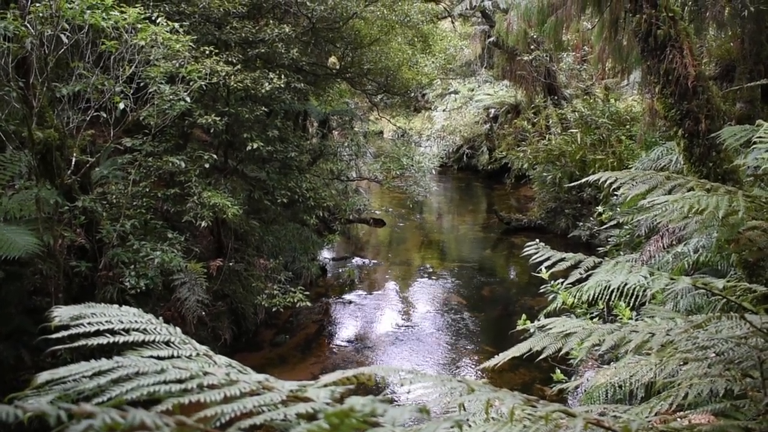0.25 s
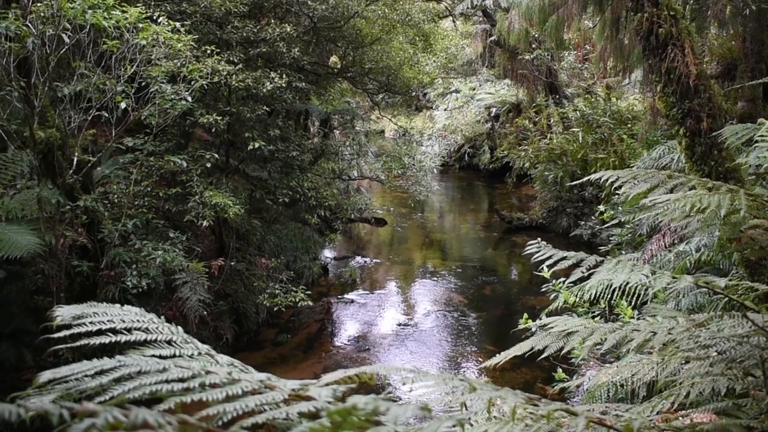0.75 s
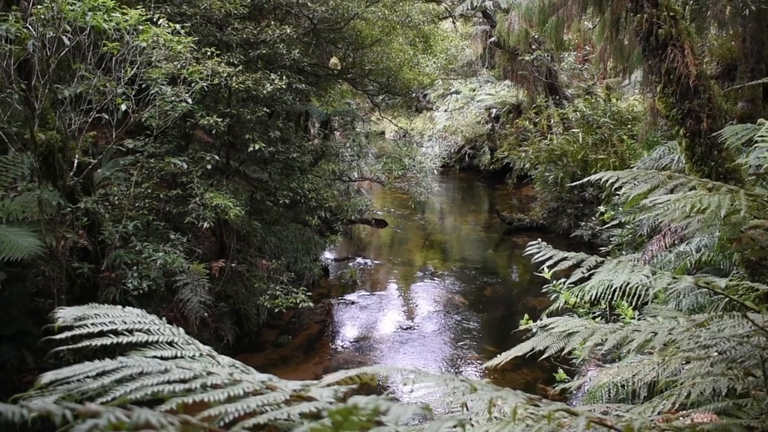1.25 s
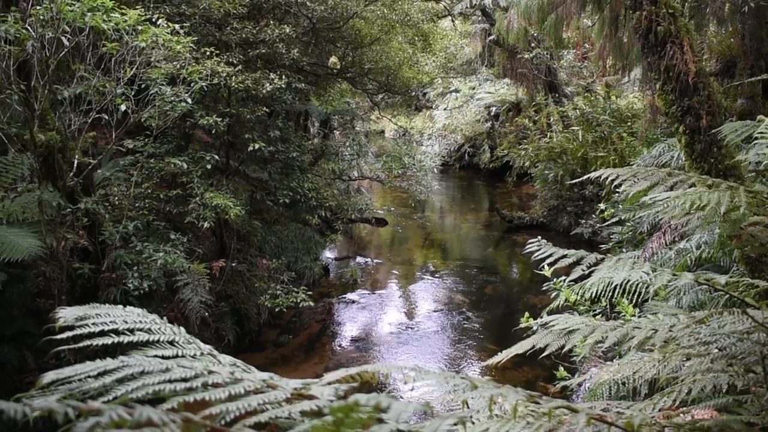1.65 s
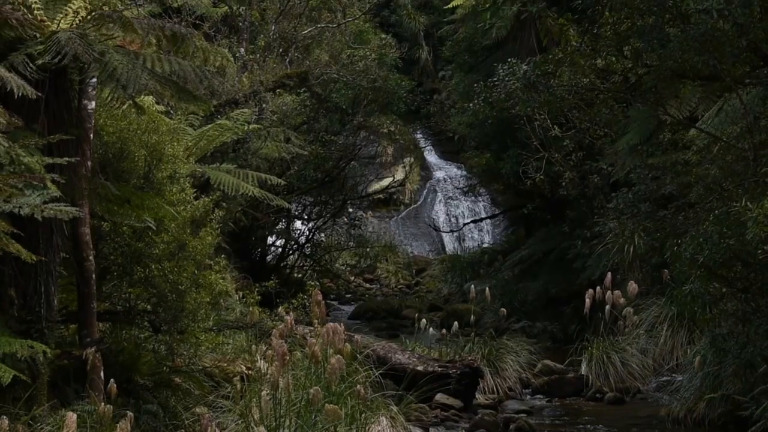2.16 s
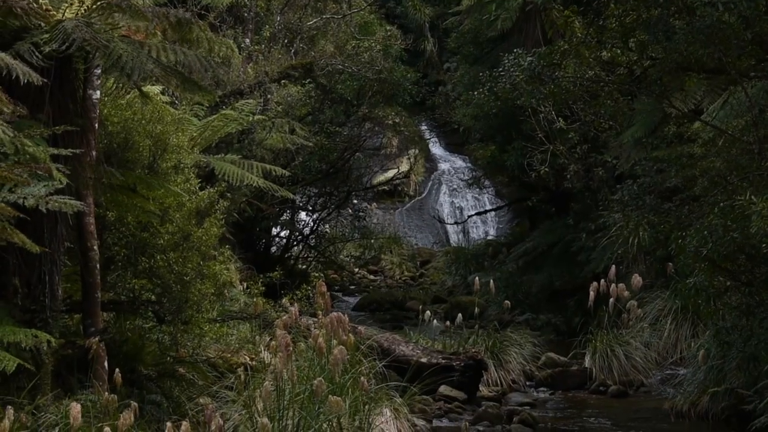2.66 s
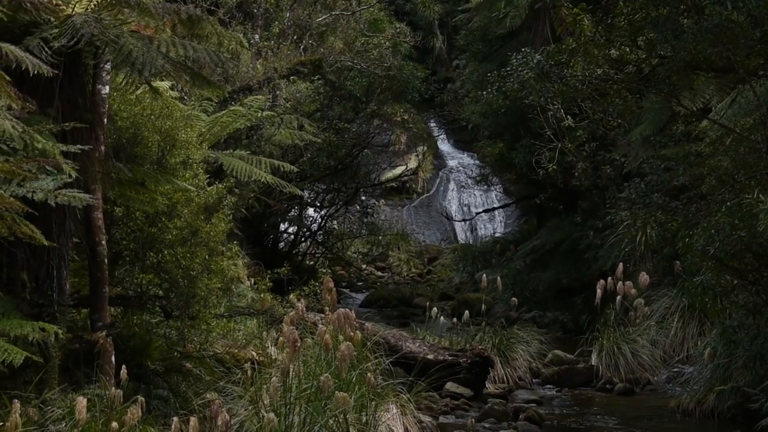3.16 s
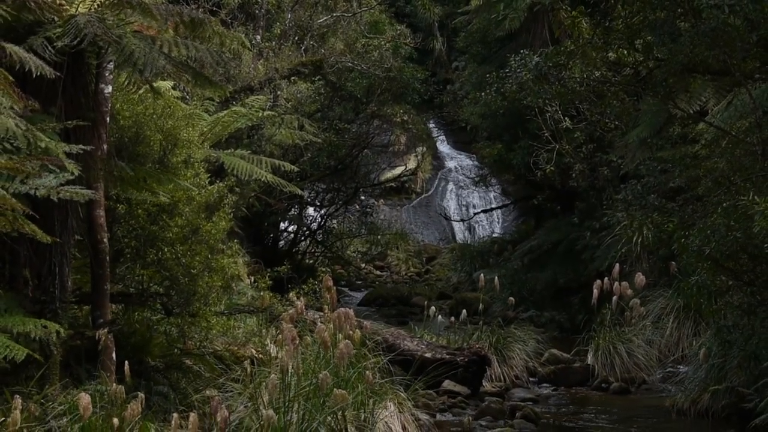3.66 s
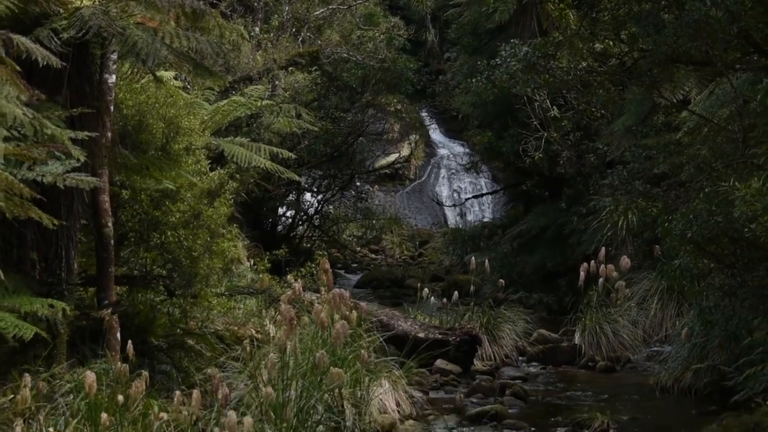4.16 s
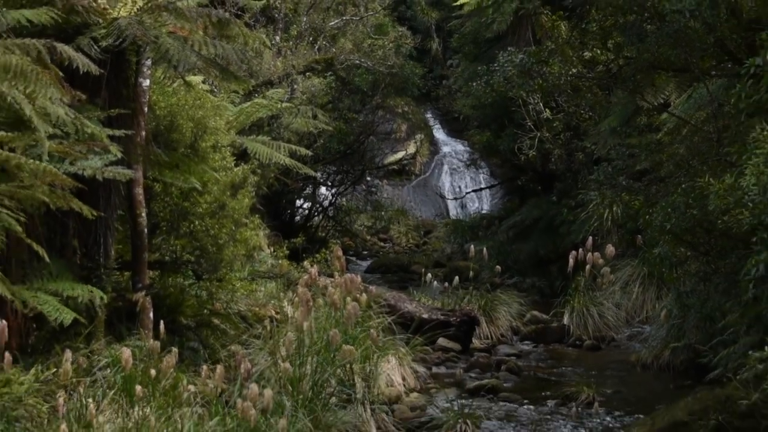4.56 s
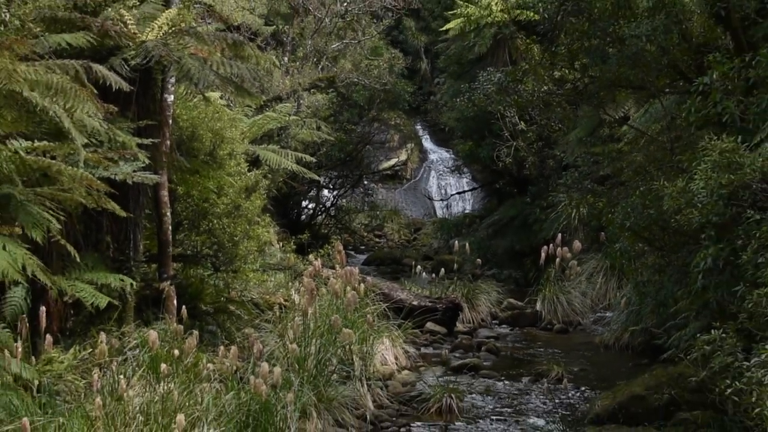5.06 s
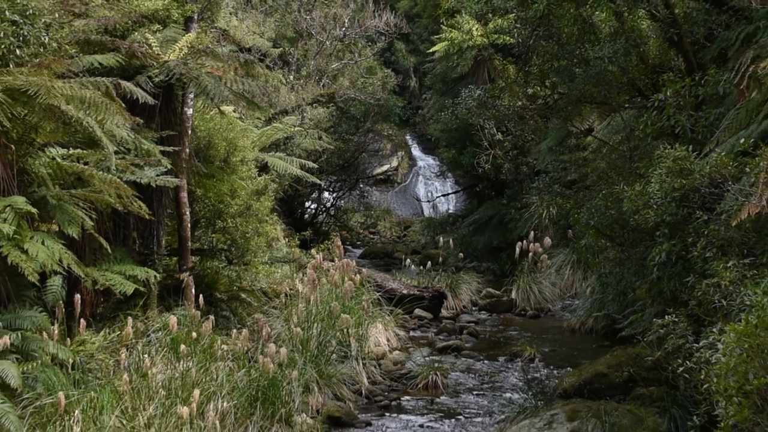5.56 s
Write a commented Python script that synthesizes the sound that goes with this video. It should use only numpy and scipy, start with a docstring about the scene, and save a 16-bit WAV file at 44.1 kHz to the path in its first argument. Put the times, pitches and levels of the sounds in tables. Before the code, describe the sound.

A soft, distant creek murmurs among ferns, with a tiny woody click near the start, faint bubbles and one small drip. A bird gives three high falling whistles that echo among the trees. Just before two seconds a soft low bump marks a hard cut to much louder rapids below a waterfall: steady rush, dense bubbling, gurgles and crisp spray, staying loud to the end. Both channels are identical.

```python
"""A slow creek murmurs in fern forest as band-modulated noise; a small woody click, a sum of damped modes, sounds.
Single bubbles (rising damped sines) and drops (noise bursts) stand out, and a bird gives three falling whistles.
Then the scene switches at once, with a soft low bump, to rocky rapids below a waterfall: a broad noise rush,
crowds of ringing bubbles, gurgling resonant hollows between the stones and spits of spray.
Both channels carry the same sound."""
import sys
import numpy as np
from scipy import signal
from scipy.fft import rfft, irfft, next_fast_len
from scipy.io import wavfile

SR = 44100
rng = np.random.default_rng(int(sys.argv[2]) if len(sys.argv) > 2 else 0)


def store_wav(level_fs):
    """Save 16-bit WAV to argv[1]."""
    pcm = np.round(np.clip(np.atleast_2d(level_fs), -1, 1) * 32767)
    wavfile.write(sys.argv[1], SR, pcm.T.astype(np.int16))


N = 256220
TIME = np.arange(N) / SR  # s

# far wash of the creek: (frequency [Hz], relative level per Hz [dB])
CREEK_SPECTRUM = [(25, -4.5), (60, -28), (100, -15.5), (140, -14.5), (210, -9.5), (270, -6), (380, -5),
                  (800, -2), (1850, -4), (4750, -8.5), (7500, -11), (10000, -14.5), (12500, -20),
                  (15500, -23.5)]
# a small hard thing clicks and bounces: (time [s], level [dB], low-pass edge [Hz])
CLICK_CONTACTS = [(0.2489, -35.5, 7000), (0.2517, -35.5, 3400), (0.2527, -45, 3400)]
# vibration modes of the clicking body: (frequency [Hz], level [dB], decay by 60 dB [s])
CLICK_MODES = [(405, -16, 0.016), (680, -12, 0.018), (1480, -3.5, 0.0086), (1850, -6, 0.012),
               (2590, -6, 0.013), (3000, -4.5, 0.015), (3220, -22, .011), (6200, -7, .003),
               (9200, -2, .003)]
# the loudest single bubbles: (time [s], starting pitch [Hz], level before the envelope [dB])
LOUD_BUBBLES = [(0.527, 980, -51), (0.647, 2300, -52), (0.660, 740, -49), (0.760, 1860, -49),
                (1.433, 1030, -52), (2.362, 610, -30), (2.686, 1070, -25.5), (2.823, 1070, -30),
                (2.958, 1826, -31), (3.148, 1386, -26), (3.424, 1100, -29), (3.753, 2730, -26),
                (4.155, 620, -34), (4.432, 1540, -28), (4.729, 2130, -26.5), (5.124, 1680, -30),
                (5.325, 1680, -28), (5.485, 813, -30)]
# the loudest drops smacking on rock: (time [s], peak level [dB], band centre [Hz])
LOUD_DROPS = [(0.7962, -47, 5600), (2.1362, -27, 7950), (2.548, -27, 7000), (2.9057, -30, 7950),
              (3.146, -25, 6900), (3.19, -28, 7000), (3.5862, -25.5, 7400), (3.7333, -26, 7700),
              (4.5745, -27, 6400), (4.8058, -25, 8800), (5.08, -29, 8700)]
# the bird's whistles: (time [s], length [s], pitch before sag [Hz], sag [Hz/s], crest [share of pitch],
# slide time [s], starting level [dB], rasp [share of pitch])
WHISTLES = [(1.117, 0.21, 4910, 1198, .075, 0.037, -54, .055),
            (1.474, .19, 4490, -250, 0.084, .052, -54.5, .05),
            (1.776, .19, 4270, -900, .13, .033, -49.5, .022)]
# far wash of the waterfall: (frequency [Hz], relative level per Hz [dB])
FALL_SPECTRUM = [(25, -46), (60, -37.5), (105, -42), (190, -23.5), (270, -14), (450, -7), (600, 0),
                 (820, -3), (1900, -1.5), (3600, -8), (8000, -12.5), (10000, -16.5), (12600, -28.5),
                 (15500, -36)]
# strength of the bubbles by pitch: (frequency [Hz], relative level per Hz [dB])
BUBBLE_COLOUR = [(250, -11), (450, -3), (700, -2.5), (1400, 4), (2300, 0), (3500, -5), (6000, -13.5)]
# strength of the spray by pitch: (frequency [Hz], relative level per Hz [dB])
SPRAY_COLOUR = [(2000, -8), (4000, -5), (7500, 0), (10000, -3), (12000, -14)]
# hollows between the stones, rung by plunging water: (frequency [Hz], bandwidth [Hz], level before drift [dB])
HOLLOWS = [(166.5, 7.1, -72), (269, 56, -68), (597, 91, -48), (964, 126, -46.5)]

SWITCH_S = 1.908
CUTOFF_HZ = 15800
# reference levels, to which each layer adds its own share
CREEK_DB, RUSH_DB, SPRAY_DB = -58, -36, -45
SPRAY_SURGE_DB, SPRAY_SURGES_PER_S = 1.4, 3.4
PLOP_T60_S = 0.053
# a whistle starts below its pitch by this share, and flicks up in this time
FLICK, FLICK_S = 0.24, 0.00707
WHISTLE_ATTACK_S, WHISTLE_RELEASE_S, WHISTLE_FADE_DB_PER_S = 0.01, 0.022, 28
DRIFT_STEP = 40  # samples between the points of a slow random curve


def from_db(db):
    """Logarithmic level: decibels become an amplitude gain."""
    return 10 ** (np.asarray(db) / 20)


def rms_one(x):
    """Power normalisation: the root mean square becomes one."""
    return x / np.sqrt(np.mean(x ** 2) + 1e-20)


def gain_at(spectrum, hz):
    """Spectral envelope: levels are interpolated on a log-frequency axis."""
    points, db = np.transpose(spectrum)
    return from_db(np.interp(np.log(np.maximum(hz, 1)), np.log(points), db))


def drift(rate):
    """Low-passed chance: noise through a double pole wanders about `rate` times a second, with spread 1."""
    pole = np.exp(-2 * np.pi * rate * DRIFT_STEP / SR)
    warm_up = 2000
    noise = rng.standard_normal(N // DRIFT_STEP + 2 + warm_up)
    slow = signal.lfilter([1], [1, -2 * pole, pole * pole], noise)[warm_up:]
    return np.interp(np.arange(N) / DRIFT_STEP, np.arange(len(slow)), rms_one(slow))


def ring(clicks, hz, t60):
    """Damped resonance: a unit click excites a decaying cosine of height 1."""
    radius = np.exp(-np.log(1000) / (t60 * SR))
    angle = 2 * np.pi * hz / SR
    poles = [1, -2 * radius * np.cos(angle), radius * radius]
    return signal.lfilter([1, 0, -1], poles, clicks + 1e-18) / 2


def add(out, s, sound):
    """Superposition: a short sound is summed in at time s."""
    at = round(s * SR)
    out[at:at + len(sound)] += sound[:N - at]


def soften(x, edge_hz, order=2):
    """Low-pass filtering: the treble above the edge is attenuated."""
    return signal.sosfilt(signal.butter(order, edge_hz, fs=SR, output="sos"), x)


def wash(spectrum, patchy_db, flicker_rate, count=20):
    """Incoherent sum: countless far splashes merge into noise whose bands swell and sink independently."""
    size = next_fast_len(N)
    hz = np.arange(size // 2 + 1) * SR / size
    noise = rfft(rng.standard_normal(size)) * gain_at(spectrum, hz)
    band = np.digitize(hz, np.geomspace(100, 14000, count - 1))
    out = np.zeros(N)
    for k in range(count):
        out += irfft(noise * (band == k), size)[:N] * from_db(patchy_db * drift(flicker_rate))
    return rms_one(out)


def grains(colour, per_s, cycles, spread_db, clump_db, clump_rate, count=28):
    """Clustered random excitation: grains of random strength each ring down 60 dB in some cycles."""
    strength_db = spread_db * np.minimum(rng.exponential(1, N), 4)
    strengths = from_db(strength_db) * rng.choice([-1, 1], N)
    born = rng.random(N) < per_s * from_db(clump_db * drift(clump_rate)) / SR
    clicks = strengths * born
    dealt = rng.integers(0, count, N)
    out = np.zeros(N)
    for k, hz in enumerate(np.geomspace(colour[0][0], colour[-1][0], count)):
        # the factor hz offsets shorter rings and wider pitch steps
        out += gain_at(colour, hz) * hz * ring(clicks * (dealt == k), hz, cycles / hz)
    return rms_one(out)


def forest(x, t60, wet_db):
    """Diffuse scattering: trunks and leaves spread a sound into a decaying noise tail."""
    t = TIME[:SR]
    tail = rng.standard_normal(SR) * np.exp(-np.log(1000) * t / t60) * (1 - np.exp(-t / 0.01))
    tail /= np.sqrt(np.sum(tail ** 2))
    return x + from_db(wet_db) * signal.fftconvolve(x, tail)[:N]


def creek():
    """Noise and bubble resonance: a soft wash carries a little babbling, dulled by the ferns."""
    babble = grains(BUBBLE_COLOUR, per_s=330, cycles=26, spread_db=1.0, clump_db=3, clump_rate=9.1)
    babble = soften(babble, edge_hz=3900)
    murmur = wash(CREEK_SPECTRUM, patchy_db=1.04, flicker_rate=4.6)
    return from_db(CREEK_DB) * (from_db(-0.23) * murmur + from_db(-15) * babble)


def click():
    """Modal vibration: a few quick contacts ring the same body, the later ones duller."""
    out, pulse = np.zeros(N), signal.unit_impulse(SR // 10)
    body = sum(from_db(db) * ring(pulse, hz, t60) for hz, db, t60 in CLICK_MODES)
    for s, db, bright_hz in CLICK_CONTACTS:
        add(out, s, from_db(db) * soften(body, bright_hz))
    return out


def plops(rise=0.026, attack_s=0.002):
    """Bubble resonance: a large bubble rings and climbs in pitch as it nears the surface."""
    out, t = np.zeros(N), TIME[:SR // 5]
    envelope = (1 - np.exp(-t / attack_s)) * np.exp(-np.log(1000) * t / PLOP_T60_S)
    for s, hz, db in LOUD_BUBBLES:
        cycles = hz * t * (1 + rise * t / PLOP_T60_S)
        add(out, s, from_db(db) * envelope * np.sin(2 * np.pi * cycles))
    return out


def spits(decay_s=0.0015, width=0.15):
    """Impact noise: a drop bursts on rock in a brief, band-passed crackle."""
    out, t = np.zeros(N), TIME[:SR // 50]
    for s, db, hz in LOUD_DROPS:
        edges = [hz / (1 + width), hz * (1 + width)]
        band = signal.butter(2, edges, "band", fs=SR, output="sos")
        burst = signal.sosfilt(band, rng.standard_normal(len(t)) * np.exp(-t / decay_s))
        add(out, s, from_db(db) * burst / np.abs(burst).max())
    return out


def bird(rasp_s=0.038, waver=0.0049, wavers_per_s=40):
    """Frequency modulation: each whistle flicks up with a rasp, slides down and rings on among the trees."""
    out, quaver, unsteady = np.zeros(N), drift(249), waver * drift(wavers_per_s)
    for s, length, hz, sag_hz_per_s, crest, slide_s, db, rasp in WHISTLES:
        age = np.clip(TIME - s, 0, length)
        fade_in, fade_out = age / WHISTLE_ATTACK_S, (length - age) / WHISTLE_RELEASE_S
        gate = np.clip(np.minimum(fade_in, fade_out), 0, 1)
        slide = crest * np.exp(-(age / slide_s) ** 4)
        flick = FLICK * np.exp(-(age / FLICK_S) ** 2)
        roughness = rasp * quaver * np.exp(-age / rasp_s)
        pitch = hz * (1 + slide - flick + unsteady + roughness) - sag_hz_per_s * age
        level = from_db(db - WHISTLE_FADE_DB_PER_S * age)
        out += gate * level * np.sin(2 * np.pi * np.cumsum(pitch) / SR)
    return forest(out, t60=0.8, wet_db=-1)


def thump(db=-47, rise_s=0.00066):
    """Single pressure pulse: a soft low bump is heard as the loud water sets in."""
    age = np.maximum(TIME - SWITCH_S, 0) / rise_s
    return -from_db(db) * age * np.exp(1 - age)


def gurgle():
    """Cavity resonance: turbulence rings the hollows, whose levels wander."""
    out = np.zeros(N)
    for hz, width, db in HOLLOWS:
        t60 = np.log(1000) / (np.pi * width)
        tone = rms_one(ring(rng.standard_normal(N), hz, t60))
        out += from_db(db + 2.16 * drift(11)) * tone
    return out


def rapids():
    """Superposed water noise: a steady rush, crowded bubbles, gurgles, and spray that surges at random."""
    rush = from_db(-0.67) * wash(FALL_SPECTRUM, patchy_db=0.64, flicker_rate=15.5)
    bubbles = grains(BUBBLE_COLOUR, per_s=1900, cycles=30, spread_db=3.5, clump_db=3.5, clump_rate=15)
    bubbles *= from_db(-6.5)
    spray = grains(SPRAY_COLOUR, per_s=2600, cycles=7.7, spread_db=6.5, clump_db=6.5, clump_rate=22)
    spray *= from_db(-4 + SPRAY_DB + SPRAY_SURGE_DB * drift(SPRAY_SURGES_PER_S))
    # small air pockets radiate no deep bass
    high_pass = signal.butter(4, 135, "high", fs=SR, output="sos")
    near = signal.sosfilt(high_pass, from_db(RUSH_DB) * bubbles + gurgle())
    return from_db(RUSH_DB) * rush + soften(near + spray, edge_hz=10500, order=4)


def scene():
    """Superposition: the creek, then the rapids; single bubbles and drops stand out of both."""
    forest_creek = creek() + click() + bird()
    water = np.where(TIME < SWITCH_S, forest_creek, rapids())
    mono = water + plops() + spits() + thump()
    return np.stack([mono, mono])


def record(dry):
    """Band limiting: a steep elliptic low-pass cuts the top."""
    low_pass = signal.ellip(12, 0.1, 80, CUTOFF_HZ, fs=SR, output="sos")
    return signal.sosfilt(low_pass, dry)


dry = scene()
out = record(dry)
store_wav(out)
```